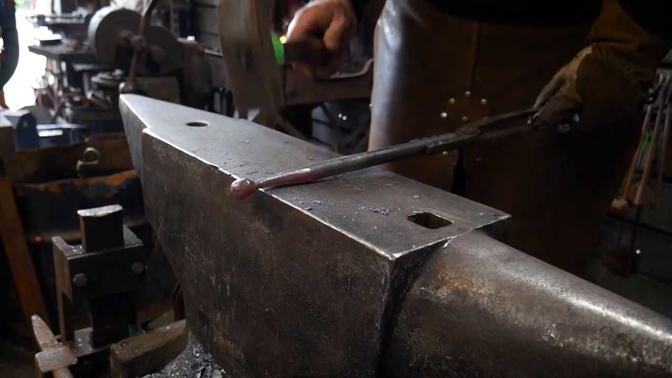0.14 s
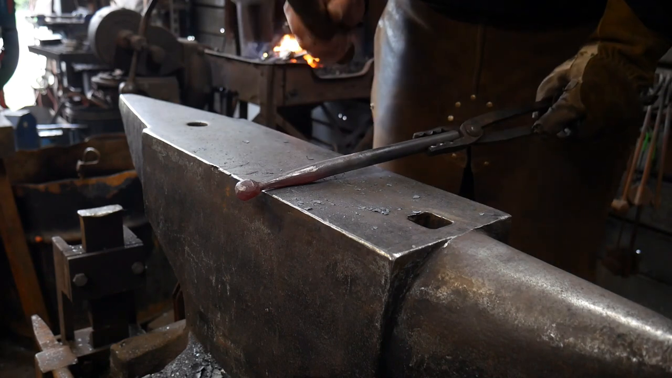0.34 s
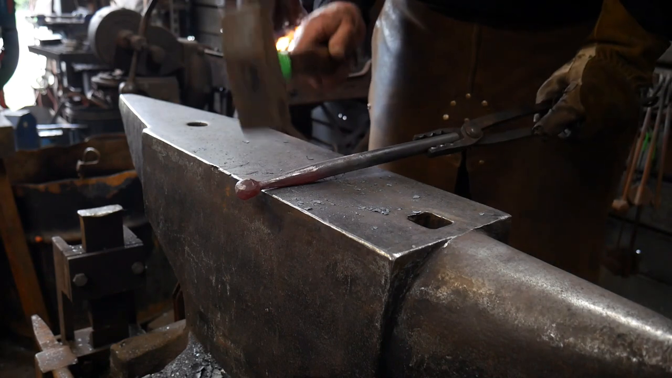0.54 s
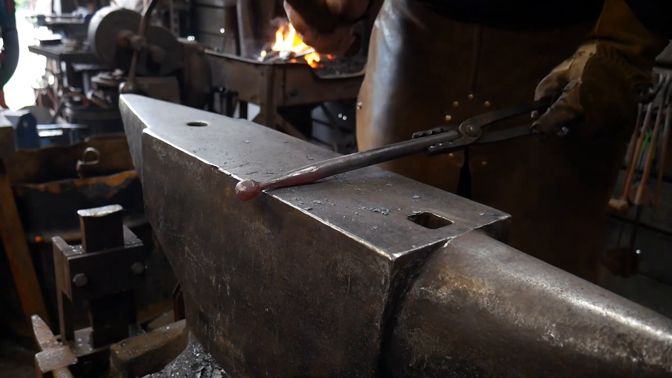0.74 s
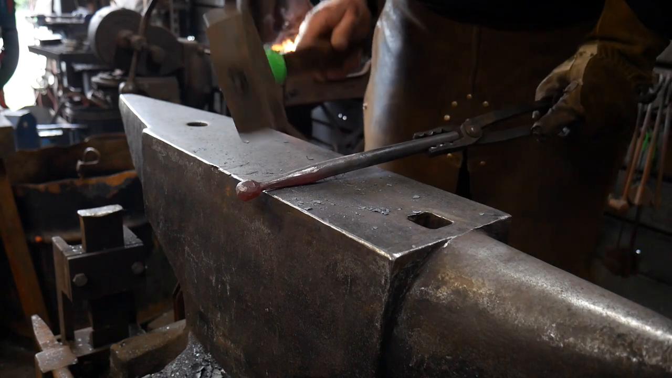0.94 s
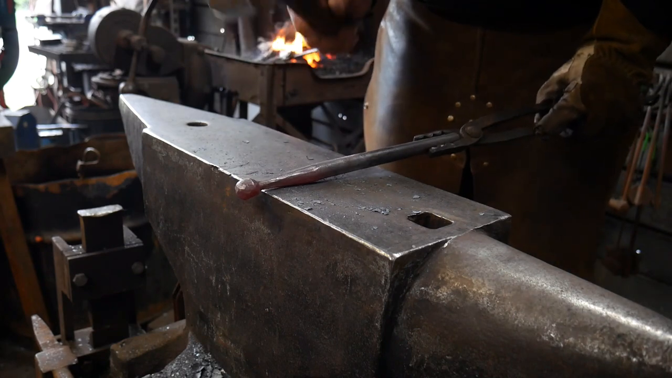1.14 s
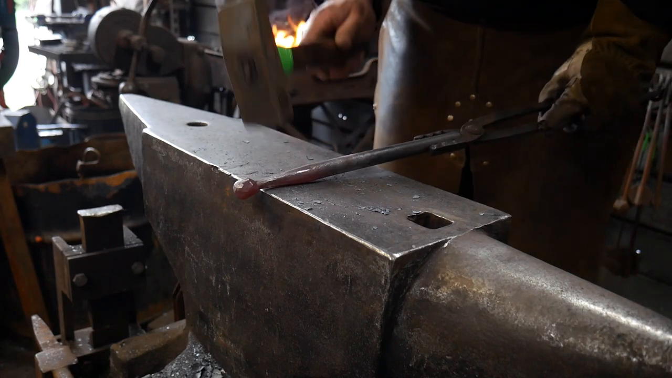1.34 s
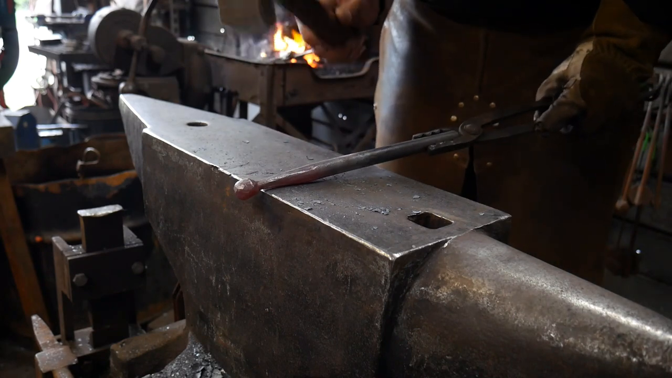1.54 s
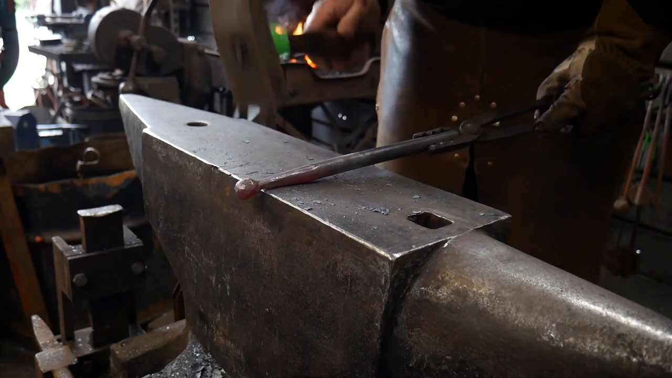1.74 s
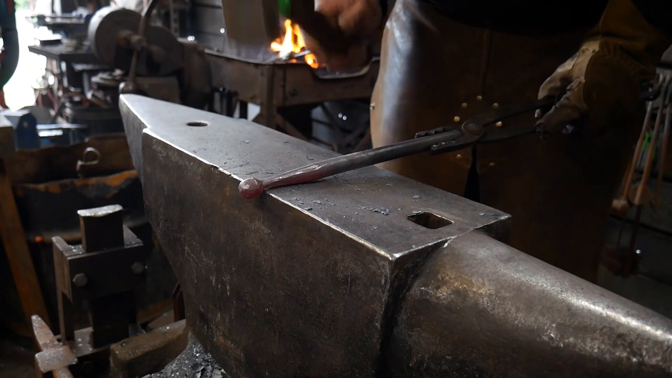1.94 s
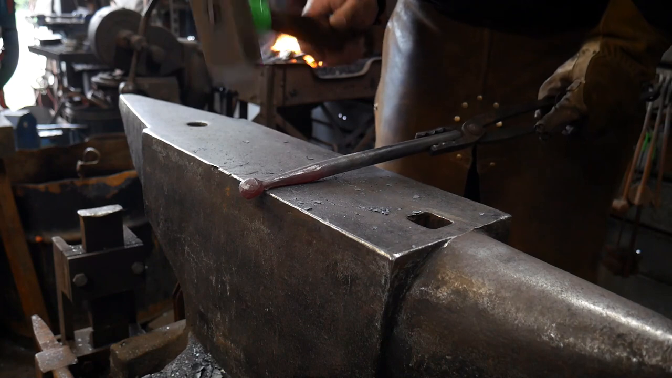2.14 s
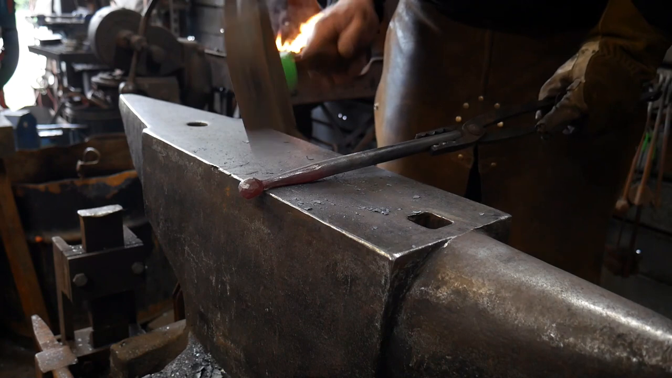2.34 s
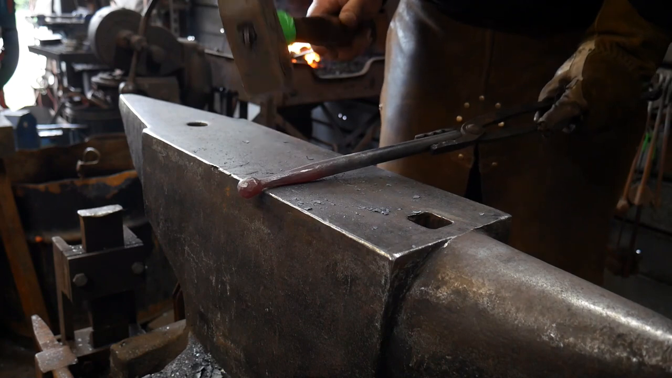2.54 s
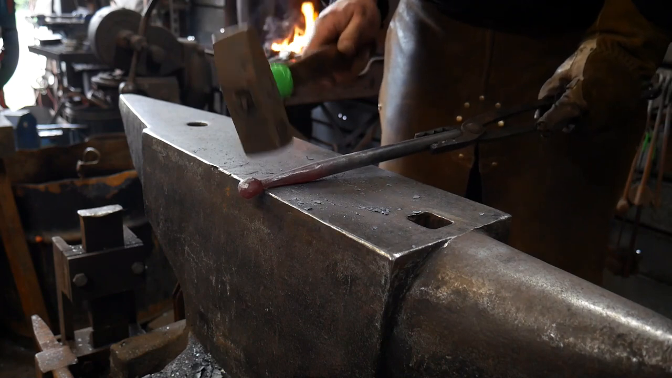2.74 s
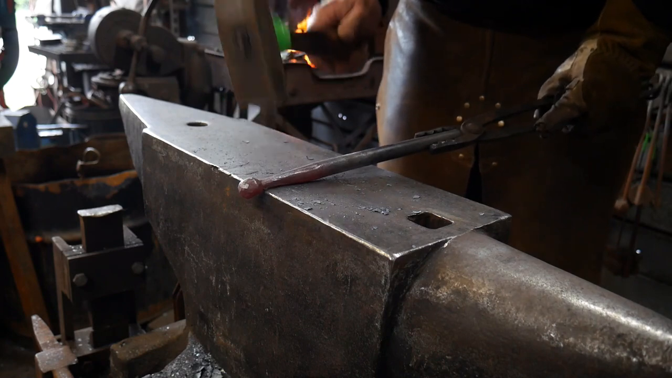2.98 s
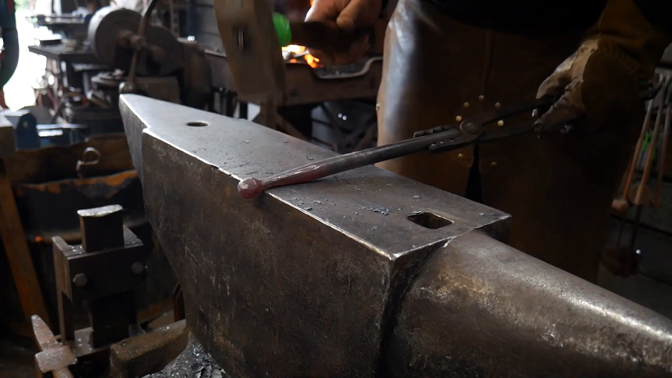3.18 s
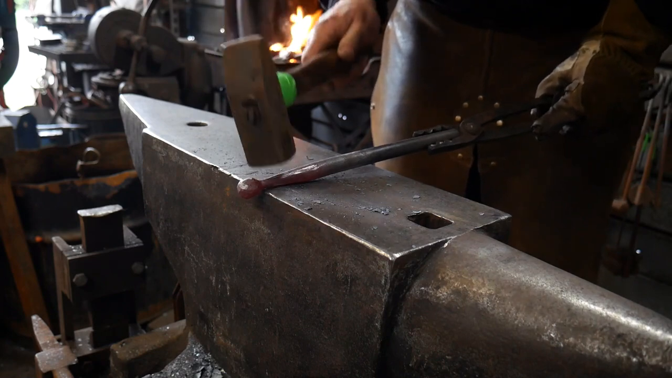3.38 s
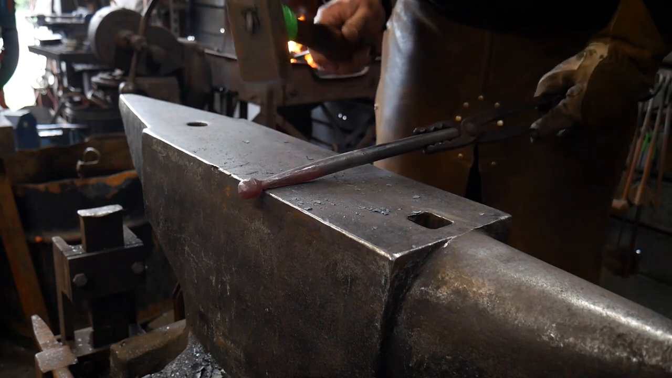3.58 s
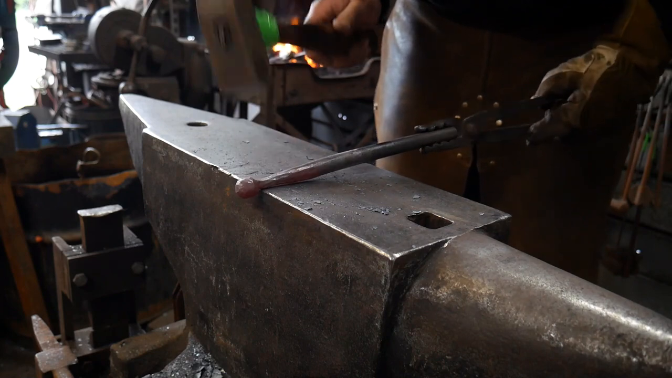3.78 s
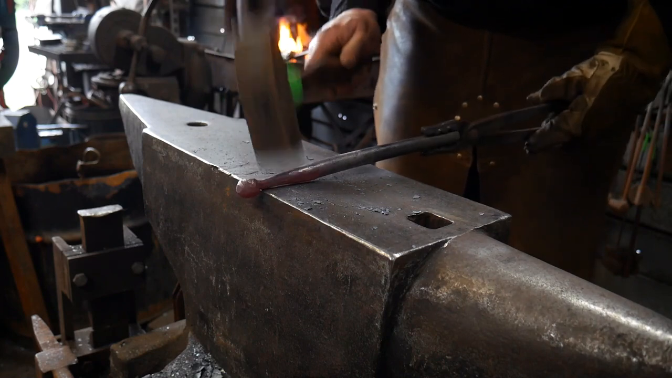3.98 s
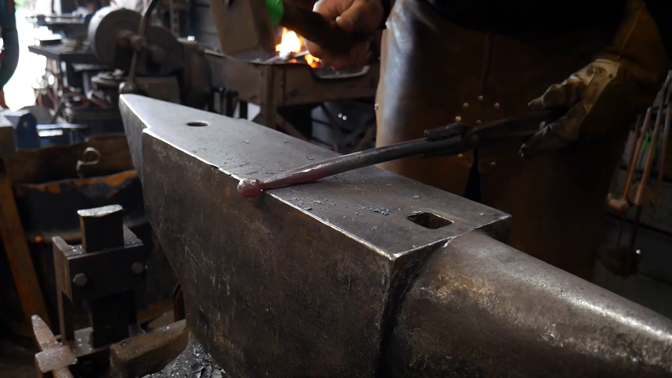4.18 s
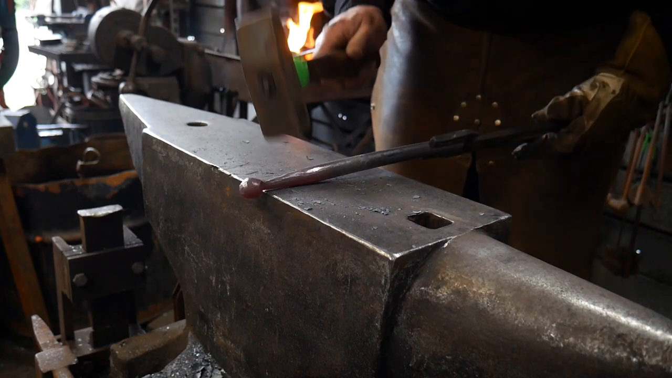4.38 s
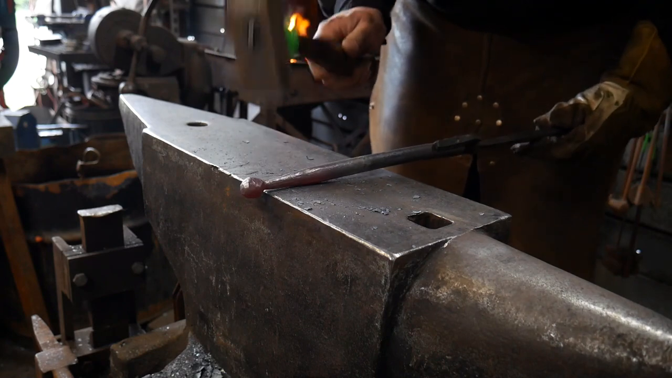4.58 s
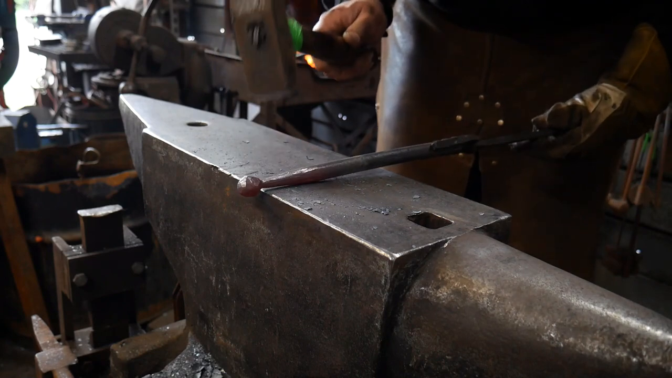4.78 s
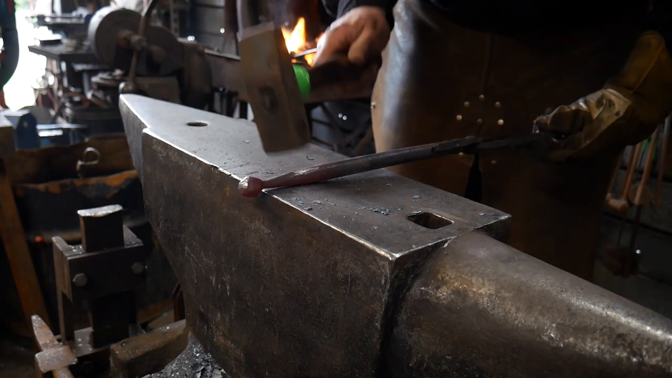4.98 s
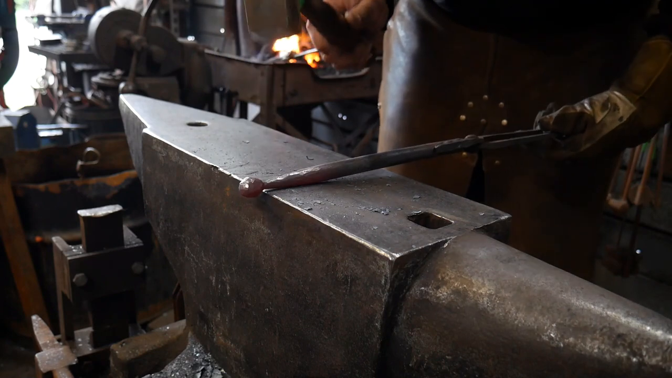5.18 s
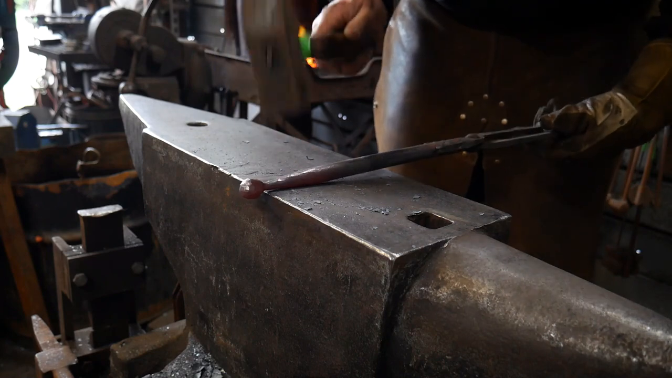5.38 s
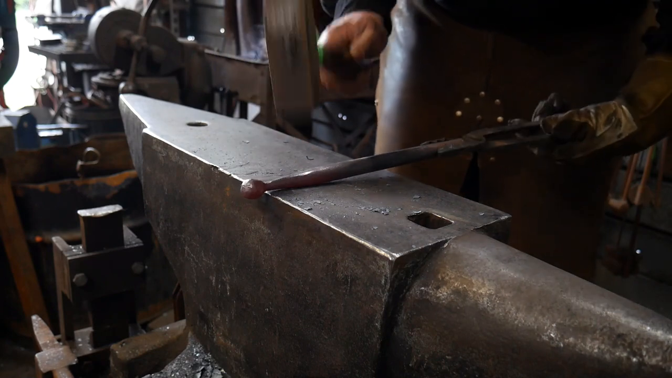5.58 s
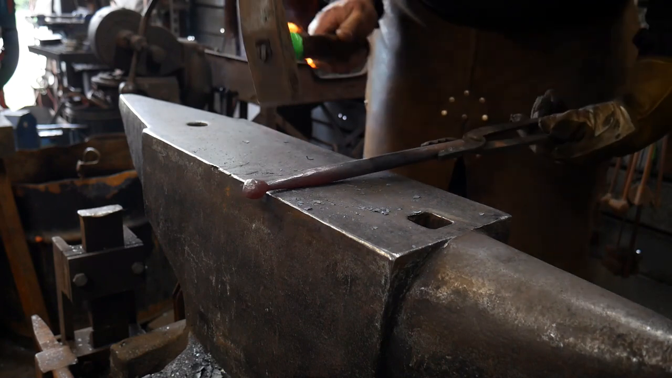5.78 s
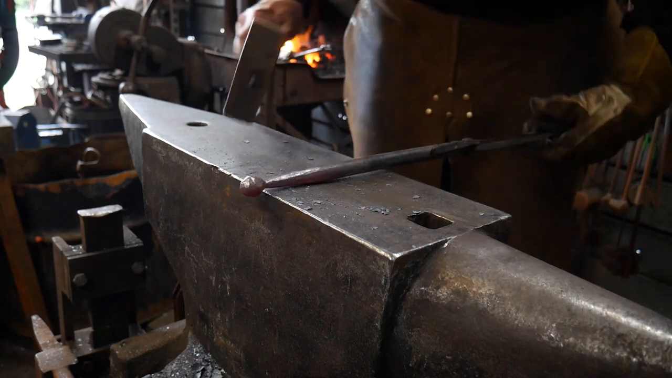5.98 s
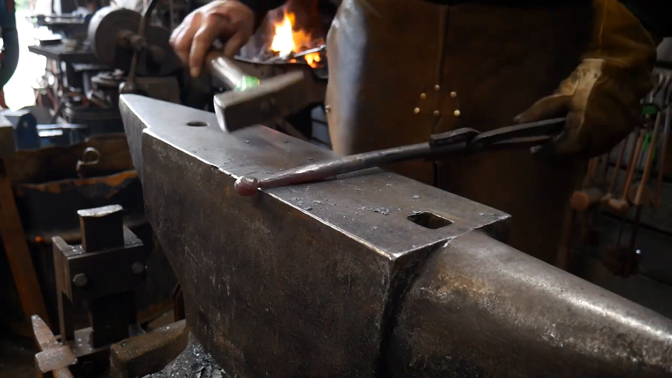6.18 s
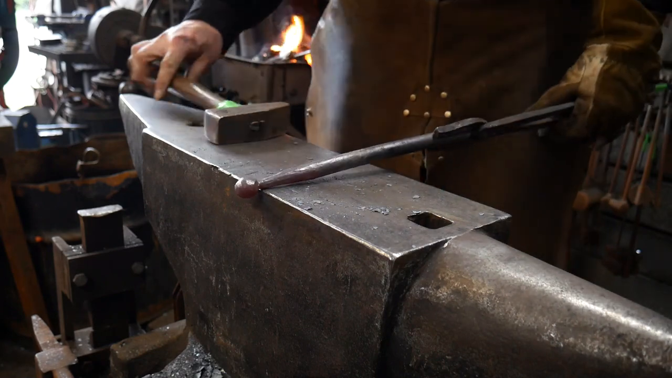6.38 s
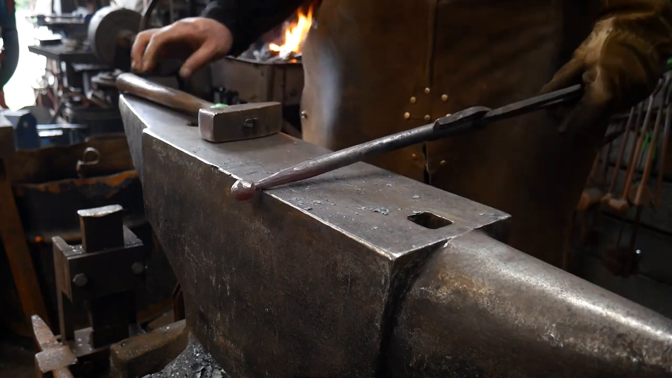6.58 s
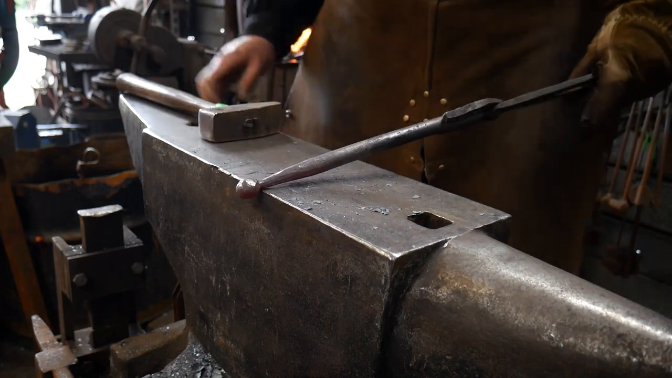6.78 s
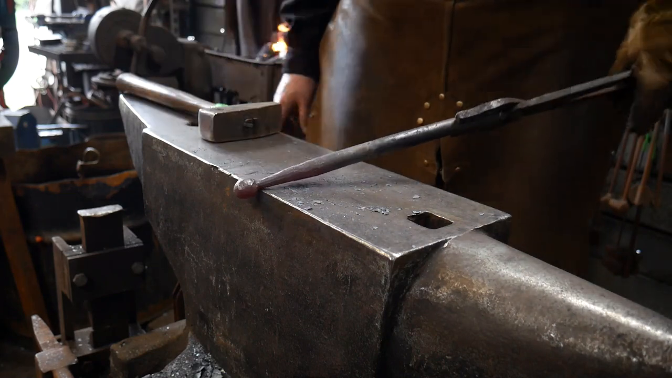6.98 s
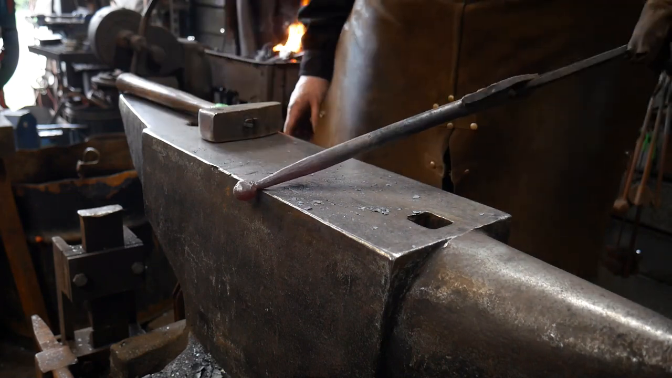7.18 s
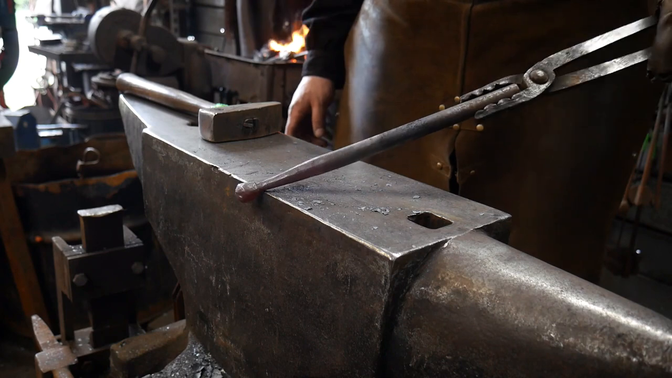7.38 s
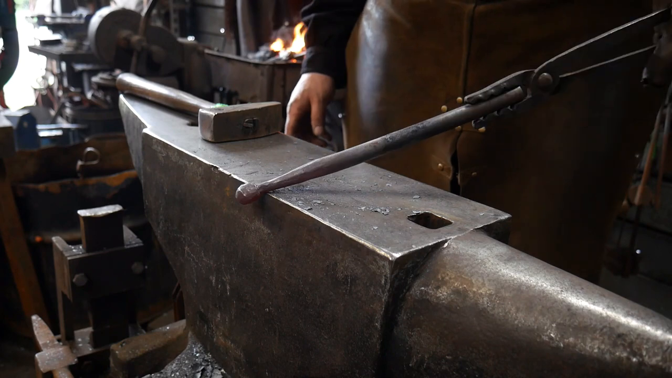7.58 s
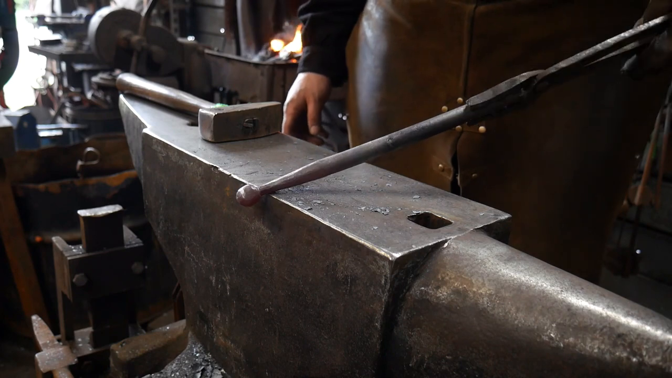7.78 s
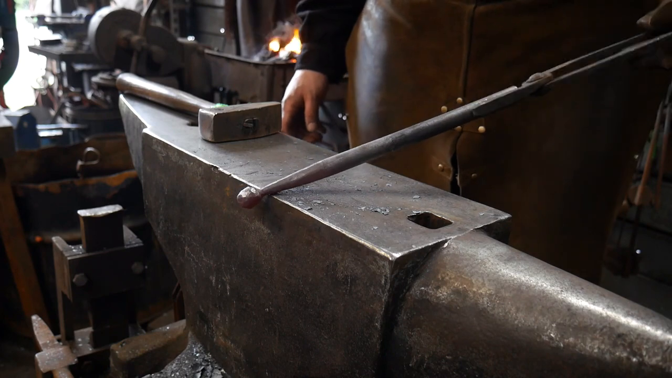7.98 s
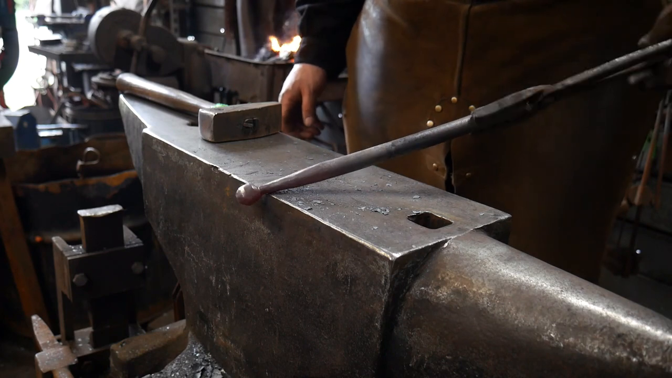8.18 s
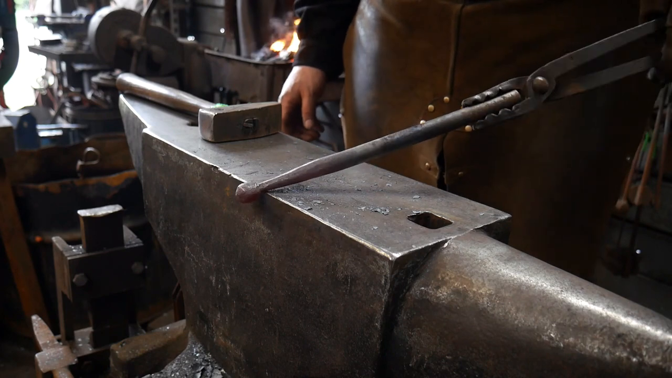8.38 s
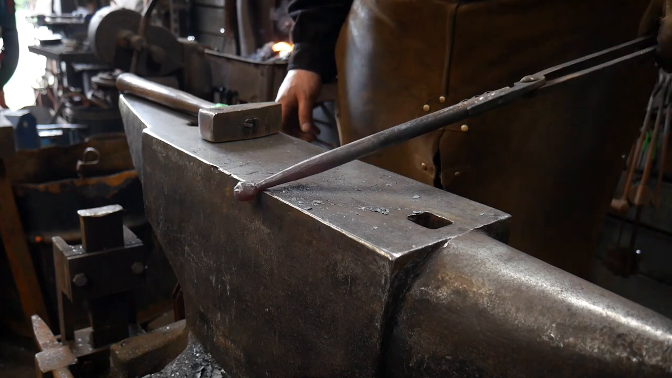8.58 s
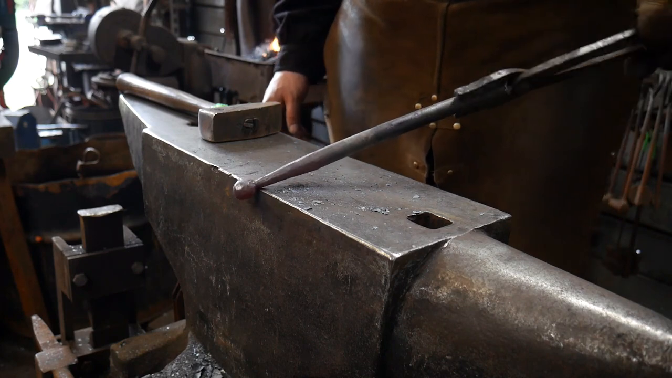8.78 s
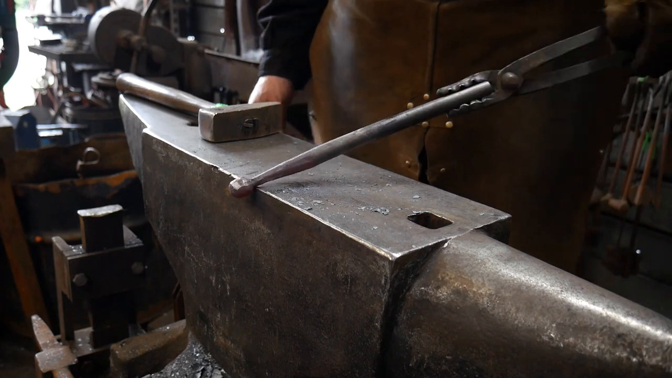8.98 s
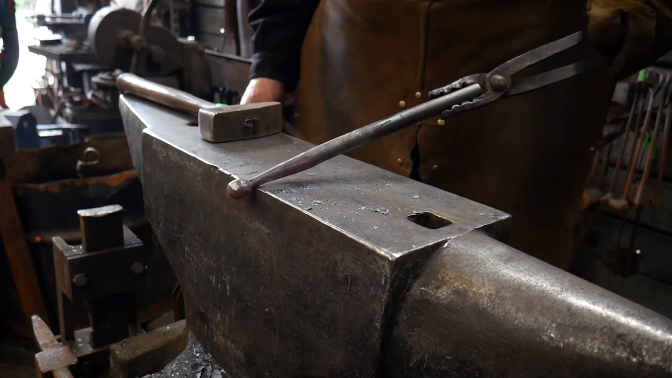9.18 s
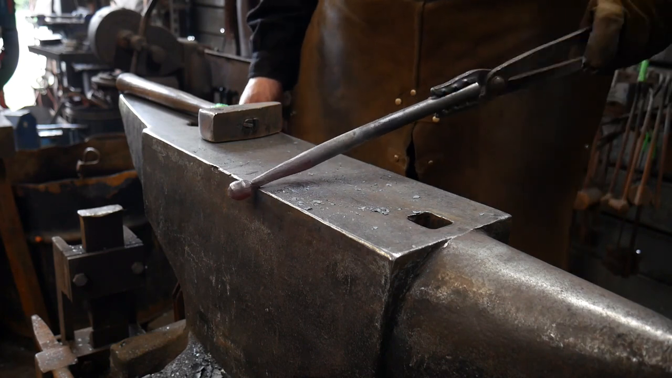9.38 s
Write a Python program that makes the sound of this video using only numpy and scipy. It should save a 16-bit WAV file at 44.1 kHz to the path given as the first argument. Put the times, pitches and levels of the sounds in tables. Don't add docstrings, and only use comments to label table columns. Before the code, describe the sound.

A hand hammer strikes a hot steel rod on an anvil in sixteen even blows, then drops, bounces and settles while a forge hums.

```python
import sys
import numpy as np
from scipy import signal
from scipy.fft import rfft, irfft
from scipy.io import wavfile
from scipy.ndimage import uniform_filter1d

SR = 44100
rng = np.random.default_rng(int(sys.argv[2]) if len(sys.argv) > 2 else 0)


def linear_from_db(decibels):
    return 10 ** (np.asarray(decibels, float) / 20)


def output_pcm(signal):
    pcm = np.clip(np.atleast_2d(signal).T, -1, 1) * 32767
    wavfile.write(sys.argv[1], SR, np.round(pcm).astype(np.int16))


N = 415995
CLOCK_S = np.arange(N) / SR
LEAD = 2000

# freq_hz, density_db_per_hz
FORGE_AIR = [(12, -53.5), (20, -13.5), (65, 3), (135, -5), (230, -2.5), (323, -6), (361, -5.5), (551, -7),
             (709, -5), (1180, -6), (1280, -11), (3620, -21.5), (14700, -41.5), (16500, -64)]
FORGE_DB = -53.5
# time_s, level_db
DRAUGHT = [(0.0, -2.5), (9.43, 0.5)]
BLOWER_HZ, BLOWER_DB = 367, -62.5

# start_s, peak_db, ring_db, handle_knock_db, knock_hz
TAPS = [
    (-.02, 1, -17, -41.5, 770),
    (6.0167, 4.5, -20, -25.5, 1413),
    (6.1809, 0.5, -22, -37, 398.6),
    (6.2931, -5.5, -23, -29.5, 772),
    (6.3167, 2, -18, -32, 788),
    (6.5215, -1.5, -13.5, -24.5, 1160),
]
# freq_hz, level_db, t60_s
FACE_MODES = [(1413, -9, .26), (2530, -14, .27), (2745, -14, .28), (3375, -8, .13), (3615, -8, .2),
              (4093, 0, .23), (4272, -23, .4), (4875, -2, .27), (5052, -5, .24), (5488, -12, .24),
              (5870, -22, .3), (6355, -14, .25), (6503, -14, .25), (6584, -24, .3), (6745, -26, .3),
              (6896, -20, .38), (7321, -24, .42), (7558, -24, .25), (8008, -26, .3), (8520, -26, .36),
              (9152, -27, .38), (9981, -30, .43), (10170, -38, .6), (10600, -30, .2), (11300, -32, .2),
              (11980, -26, .18), (12250, -34, .38), (12950, -32, .25), (13320, -26, .1), (14000, -34, .15)]
# freq_hz, level_db, t60_s
SLAP_MODES = [(700, -18, 0.0077), (1076, -17.5, 0.06), (1988, -10, 0.0094), (2600, 5, 0.011),
              (3662, 0.5, 0.045)]
# freq_hz, density_db_per_hz
CLATTER = [(150, -30), (500, -12), (1400, -3), (3000, 0), (5000, -5), (6800, -11), (7300, -28),
           (16000, -42)]
# freq_hz, density_db_per_hz
CRACK = [(180, -45), (300, -4.5), (3690, 0.5), (4830, -4.5), (6120, 3), (7240, -8.5), (12200, -11),
         (15200, -16), (16000, -22.5), (16800, -46.5)]
# freq_hz, level_db, t60_s, width_octaves
STAND = [(36, -6.5, 0.59, .6), (156.4, 2, 0.86, 0.29), (230, -1.5, 0.52, 0.15), (430, -5, 0.19, .3)]
SIDE_DULL_DB = 13.5

# start_s, peak_db, centre_hz, t60_s
KNOCKS = [
    (0.045, -20.5, 1560, 0.025),
    (.047, -20, 3330, 0.018),
    (.052, -24, 770, 0.043),
    (4.733, -20, 290, 0.045),
    (4.974, -50.5, 3970, 0.0045),
    (6.79, -40, 264, 0.042),
    (6.836, -44.5, 3850, 0.084),
    (6.838, -39.5, 875, .03),
    (6.841, -35.5, 2180, 0.034),
]
KNOCK_OCTAVES = 0.48
# start_s, peak_db, centre_hz
REBOUNDS = [
    (1.388, -18, 3900),
    (2.812, -12, 4600),
    (3.765, -8.5, 5460),
    (4.108, -15.5, 6000),
    (4.753, -19.5, 2850),
    (5.054, -19.5, 4780),
]
REBOUND_OCTAVES, REBOUND_T60_S = 0.7, 0.025
# start_s, peak_db, centre_hz
ROCKING = [
    (6.344, -22, 2500),
    (6.375, -22, 1900),
    (6.414, -25, 2000),
    (6.545, -22, 1900),
    (6.565, -15, 3000),
    (6.586, -22, 1900),
    (6.62, -28, 1700),
]
ROCK_OCTAVES, ROCK_T60_S = 0.83, 0.023

# start_s, head_db, slap_db, heel_db, waist_db (anvil levels 0.1 s later)
BLOWS = [(0.5681, -9, -11, -47, -51.5), (0.961, -8.5, -11, -53, -69), (1.3561, -8.5, -12.5, -52.5, -60.5),
         (1.738, -11.5, -11.5, -48.5, -53), (2.1074, -11, -8.5, -44.5, -49.5),
         (2.46, -11, -11.5, -40.5, -39.5), (2.7925, -12, -14, -55, -62), (3.1249, -13.5, -10.5, -41.5, -44),
         (3.4353, -12, -13.5, -53.5, -45.5), (3.7505, -9.5, -15.5, -61.5, -68.5),
         (4.0847, -7, -15, -60, -63.5), (4.4163, -9.5, -13, -42.5, -37), (4.7315, -14.5, -19.5, -69.5, -61),
         (5.0357, -10, -13, -50, -43), (5.3693, -9.5, -12, -50, -38.5), (5.6939, -10.5, -11, -49, -33.5)]
# freq_hz, level_db, t60_s
HEAD_MODES = [(4910, -8, 0.051), (5845, -5, 0.11), (6140, -2.5, 0.18), (7470, -12, 0.026)]
# freq_hz, level_db, t60_s
HEEL_MODES = [(2745, 0, .3), (1530, -9, .35), (1685, -9, .3), (5052, -9, .27), (12250, -22, .4)]
# freq_hz, level_db, t60_s
WAIST_MODES = [(3618, 0, .75), (3472, -16, .3)]
# freq_hz, level_db, t60_s
HORN_MODES = [(4972, 0, .45), (7558, -18, .3), (12460, -17, .3)]
HORN_DB = -35
# freq_hz, level_db, t60_s
BODY_MODES = [(1413, 0, .28), (2230, -10, .7), (2398, 4, .22), (2815, 2, .2), (3760, 0, .2),
              (4095, -6, .24), (5800, -4, .3), (6070, -4, .3), (6335, -4, .25), (8150, -6, .15),
              (9572, -14, .5), (9981, -13, .35), (10180, -21, .6), (11400, -12, .2), (12900, -16, .25),
              (13300, -10, .14), (14100, -14, .18), (15100, -16, .2)]
# freq_hz, density_db_per_hz
SHAKE = [(300, -11), (900, 4.5), (2500, -2.5), (4400, -8), (6200, -2.5), (7500, -9.5), (14500, -18),
         (15500, -41)]
ROD_MODES, ROD_LOW_HZ, ROD_HIGH_HZ = 90, 1300, 15000
ROD_DB, ROD_T60_S, ROD_SCATTER_DB = -27, 0.23, 5

# peak_s, length_s, level_db
RUSTLE = [(1.273, 0.52, -56.5), (6.93, .1, -64), (7.236, 0.19, -59), (7.34, 0.075, -59.5),
          (7.574, 0.32, -60.5), (7.99, 0.45, -66.5), (8.138, .12, -67.5), (8.286, 0.11, -53.5),
          (8.407, 0.11, -61), (8.633, 0.31, -64), (8.773, 0.081, -58.5), (9.04, 0.47, -56),
          (9.274, 0.13, -55.5)]
# freq_hz, density_db_per_hz
CLOTH = [(1180, -39), (2000, 4), (5190, 1), (7070, -5.5), (13200, -17.5), (15800, -21), (16500, -48.5)]
SWELL_SHARE, STROKE_DROP_DB = 0.65, 19.5

# start_s, length_s, start_hz, end_hz, level_db
SLURS = [
    (1.605, 0.048, 3060, 3370, -57),
    (1.633, 0.044, 3555, 2345, -48.5),
    (1.853, 0.076, 2600, 2020, -55.5),
    (2.597, 0.039, 2350, 2100, -54),
    (2.999, 0.077, 2346, 3100, -52),
    (6.767, 0.086, 2900, 2010, -53),
    (8.101, 0.025, 2690, 2310, -54),
    (8.143, 0.048, 2880, 2000, -46.5),
    (8.223, .057, 3120, 3320, -53),
    (8.321, 0.041, 2325, 1924, -51.5),
]
# start_s, length_s, pitch_hz, level_db
WHISTLES = [(1.693, 0.06, 2450, -40), (2.301, 0.054, 2600, -53), (2.336, .07, 3150, -53),
            (2.392, 0.13, 2460, -42.5), (3.723, .04, 2960, -55), (3.843, 0.11, 2380, -59.5),
            (3.91, 0.039, 2820, -57), (3.998, 0.063, 2590, -65.5), (6.634, 0.043, 2470, -47),
            (6.702, 0.071, 2930, -55.5), (7.028, 0.056, 2275, -68), (7.464, 0.05, 2490, -45.5),
            (7.528, .043, 3530, -68), (7.538, 0.065, 2680, -48), (7.611, 0.098, 2410, -48.5),
            (8.057, 0.086, 6170, -56.5), (8.077, 0.098, 3490, -64), (8.084, 0.058, 2854, -53.5),
            (8.285, 0.073, 2306, -52)]
WARBLE = 0.023

# freq_hz, level_db, t60_s
SHOP = [(235, -24.5, 0.46), (510, -24, 0.36), (1030, -28.5, 0.61), (2000, -26, 0.24), (3800, -21.5, 0.33),
        (8000, -25, .24), (14000, -26, .17)]
ECHO_TOP_HZ, TOP_HZ = 15200, 16600
# freq_hz, level_db
SIDE_COLOUR = [(60, -21), (200, -25), (600, -25), (2000, -24), (4400, -23.5), (8100, -11), (14500, -6),
               (16000, -28)]
TRACE_DB, TRACE_KNEE, SIDE_HISS_DB = -25.5, 0.06, -84


def curve(points, size):
    hz, db = np.transpose(points)
    return linear_from_db(np.interp(np.log(np.fft.rfftfreq(size, 1 / SR) + 1), np.log(hz), db))


def colour(x, points):
    y = irfft(rfft(x) * curve(points, len(x)), len(x))
    return y / y.std()


def band(x, hz, octaves):
    grid_hz = np.fft.rfftfreq(len(x), 1 / SR) + 1
    shape = np.exp(-(np.log2(grid_hz / hz) / octaves) ** 2)
    y = irfft(rfft(x) * shape, len(x))
    return y / y.std()


def fade(t_s, t60_s):
    return np.exp(-np.log(1000) * t_s / max(t60_s, 1e-3))


def walk(rate_hz):
    hold = int(SR / rate_hz)
    steps = np.repeat(rng.standard_normal(N // hold + 1), hold)
    return 0.97 * uniform_filter1d(steps, hold)[:N]


def add(out, start_s, y):
    i = int(round(start_s * SR)) + LEAD
    out[i:i + len(y)] += y[:len(out) - i]


def ring(modes, scatter_db, detune, dull_db=0, size=30000):
    y = np.zeros(size)
    draws = rng.standard_normal((len(modes), 2))
    for (hz, db, t60_s), (size_draw, pitch_draw) in zip(modes, draws):
        t_s = np.arange(min(size, int(t60_s * SR))) / SR
        gain = linear_from_db(db + scatter_db * size_draw - dull_db * np.log2(hz / 1413))
        tone = np.sin(2 * np.pi * hz * (1 + detune * pitch_draw) * t_s)
        y[:len(t_s)] += gain * tone * fade(t_s, t60_s)
    return y


def burst(hz, octaves, t60_s, rise_s, size):
    t_s = np.arange(size) / SR
    return band(rng.standard_normal(size), hz, octaves) * fade(t_s, t60_s) * np.minimum(t_s / rise_s, 1)


def echo(x, bands, gap_s):
    t_s = np.arange(SR) / SR
    tail = 0
    for hz, db, t60_s in bands:
        build_up = 1 - np.exp(-t_s * hz / 5.8)
        shape = fade(t_s, t60_s) * build_up * (t_s > gap_s)
        noise = band(rng.standard_normal(SR), hz, 0.63)
        tail = tail + linear_from_db(db) * noise * shape / np.sqrt(np.sum(shape ** 2))
    tail = signal.sosfilt(signal.butter(12, ECHO_TOP_HZ, fs=SR, output="sos"), tail)
    return signal.fftconvolve(x, tail)[:len(x)]


def forge():
    swell = walk(0.077)
    spectrum = rfft(colour(rng.standard_normal(N), FORGE_AIR))
    octave = np.log2(np.fft.rfftfreq(N, 1 / SR) + 1)
    air = 0
    for centre in range(4, 15):
        share = np.clip(1 - abs(octave - centre), 0, 1)
        flicker = linear_from_db(0.88 * swell + 0.4 * walk(4.8))
        air = air + flicker * irfft(spectrum * share, N)
    blade_hz = BLOWER_HZ + 1.2 * walk(4.3)
    tone = np.sin(2 * np.pi * np.cumsum(blade_hz) / SR) * linear_from_db(BLOWER_DB + 1.5 * walk(2.3))
    draught = linear_from_db(np.interp(CLOCK_S, *np.transpose(DRAUGHT)))
    return draught * (linear_from_db(FORGE_DB) * air + tone)


def crack(t60_s, size=3000):
    t_s = np.arange(size) / SR
    return colour(rng.standard_normal(size), CRACK) * fade(t_s, t60_s) * np.minimum(t_s / 0.0001, 1)


def thump():
    return sum(linear_from_db(db) * burst(hz, octaves, t60_s, 2 / hz, size=24000) for hz, db, t60_s, octaves in STAND)


def tapping():
    near, anvil, ground = np.zeros((3, N + LEAD))
    t_s = np.arange(20000) / SR
    for s, peak_db, ring_db, knock_db, knock_hz in TAPS:
        dull_db = SIDE_DULL_DB * (s == TAPS[-1][0])
        add(anvil, s, linear_from_db(peak_db - 1 - dull_db / 2) * crack(0.004))
        add(near, s, linear_from_db(peak_db - 11.0) * ring(SLAP_MODES[1:], 0.81, 0.16, size=3000))
        clatter = colour(rng.standard_normal(len(t_s)), CLATTER) * fade(t_s, 0.3)
        add(anvil, s, linear_from_db(peak_db - 27) * clatter)
        add(anvil, s, linear_from_db(ring_db) * ring(FACE_MODES, 1.2, 0.00044, dull_db=dull_db))
        handle_modes = [(knock_hz, 0, 0.25), (1.1 * knock_hz, -4, 0.25)]
        add(anvil, s, linear_from_db(knock_db) * ring(handle_modes, 0, 0))
        add(ground, s, linear_from_db(peak_db - 55) * thump())
    return near, anvil, ground


def rattling():
    near = np.zeros(N + LEAD)
    hits = [(s, db, hz, KNOCK_OCTAVES, t60_s) for s, db, hz, t60_s in KNOCKS]
    hits += [(*row, REBOUND_OCTAVES, REBOUND_T60_S) for row in REBOUNDS]
    hits += [(*row, ROCK_OCTAVES, ROCK_T60_S) for row in ROCKING]
    for s, db, hz, octaves, t60_s in hits:
        add(near, s, linear_from_db(db + 1) * burst(hz, octaves, t60_s, 0.0015, size=4000))
    return near


def weigh(x, slap_db, head_db):
    return irfft(rfft(x) * curve([(4000, slap_db), (5000, head_db)], len(x)), len(x))


def rod():
    place, life = rng.random((ROD_MODES, 2)).T
    hz = ROD_LOW_HZ + (ROD_HIGH_HZ - ROD_LOW_HZ) * place
    shake_hz, shake_db = np.transpose(SHAKE)
    db = np.interp(np.log(hz), np.log(shake_hz), shake_db)
    return list(zip(hz, db, ROD_T60_S * (0.4 + life)))


def forging():
    near, anvil, ground = np.zeros((3, N + LEAD))
    t_s = np.arange(30000) / SR
    scatter_db = 4
    rod_modes = rod()
    choke = 0.16 + 1.0 / (1 + (t_s[:3000] / 0.0044) ** 4)
    lift_off = 1 - np.exp(-t_s / 0.003)
    for s, head_db, slap_db, heel_db, waist_db in BLOWS:
        add(near, s, -linear_from_db(slap_db - 0.5) * ring(SLAP_MODES, 1.0, 0.11, size=3000))
        head = choke * ring(HEAD_MODES, scatter_db - 5.5, 0.0052, size=3000)
        add(near, s + 0.0004, linear_from_db(head_db - 1.0) * head)
        add(near, s, linear_from_db(5) * weigh(choke * crack(0.063), slap_db, head_db))
        add(near, s - 0.0025, linear_from_db(slap_db - 25.5) * crack(0.043))
        add(ground, s, linear_from_db(slap_db / 2 - 39.5) * thump())

        rings = linear_from_db(slap_db - 25.0) * ring(BODY_MODES, scatter_db, 0.00027)
        chatter = weigh(colour(rng.standard_normal(len(t_s)), SHAKE), slap_db, head_db)
        rings += linear_from_db(-15.0) * chatter * fade(t_s, 0.3)
        rings += linear_from_db(ROD_DB) * weigh(ring(rod_modes, ROD_SCATTER_DB, 0.01), slap_db, head_db)
        families = [(HEEL_MODES, heel_db), (WAIST_MODES, waist_db), (HORN_MODES, slap_db + HORN_DB)]
        for modes, later_db in families:
            start_db = later_db + 6 / modes[0][2] - 1
            rings += linear_from_db(start_db) * ring(modes, 1.0, 0.0002)
        anvil[int(s * SR) + LEAD:] *= 0.1
        add(anvil, s, rings * lift_off)
    return near, anvil, ground


def rustle():
    gain = 0
    for peak_s, length_s, db in RUSTLE:
        before = (peak_s - CLOCK_S) / SWELL_SHARE
        after = (CLOCK_S - peak_s) / (1 - SWELL_SHARE)
        away = np.maximum(before, after) / length_s
        gain = gain + linear_from_db(db - STROKE_DROP_DB * np.minimum(away, 4) ** 2)
    grains = rng.standard_normal(N) * linear_from_db(1.5 * rng.exponential(size=N))
    return gain * colour(grains, CLOTH)


def songbird():
    out = np.zeros(N + LEAD)
    warble = 1 + WARBLE * walk(150)
    level_notes = [(s, length_s, hz, hz, db) for s, length_s, hz, db in WHISTLES]
    for s, length_s, start_hz, end_hz, db in level_notes + SLURS:
        u = np.linspace(0, 1, int(length_s * SR))
        hz = (start_hz + (end_hz - start_hz) * u) * warble[int(s * SR):][:len(u)]
        swell = np.sqrt(np.abs(np.sin(np.pi * u)))
        add(out, s, linear_from_db(db) * swell * np.sin(2 * np.pi * np.cumsum(hz) / SR))
    return 0.25 * out + echo(out, [(2900, 0.0054, 0.42)], gap_s=0.004)


def scene():
    near, anvil, ground = np.add(tapping(), forging())
    near = near + rattling()
    no_bass = signal.butter(2, 320, "high", fs=SR, output="sos")
    near, anvil = signal.sosfilt(no_bass, [near, anvil])
    walls = echo(near + 0.25 * anvil, SHOP, gap_s=0.002)
    mid = (near + anvil + ground + walls + songbird())[LEAD:] + forge() + rustle()
    trace = linear_from_db(TRACE_DB) * np.tanh(mid / TRACE_KNEE)
    side = irfft(1j * rfft(trace) * curve(SIDE_COLOUR, N), N)
    side += linear_from_db(SIDE_HISS_DB) * rng.standard_normal(N)
    return np.array([mid + side, mid - side])


def band_limit(x):
    return signal.sosfilt(signal.butter(12, 17020, fs=SR, output="sos"), x)


def record(dry):
    held = 0.88 * np.tanh(dry / 0.88)
    top_cut = signal.ellip(8, 0.2, 70, TOP_HZ, fs=SR, output="sos")
    mix = signal.sosfilt(top_cut, held)
    return band_limit(mix)


dry = scene()
out = record(dry)
output_pcm(out)
```